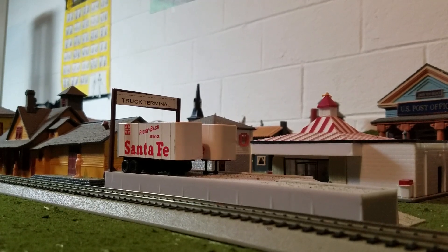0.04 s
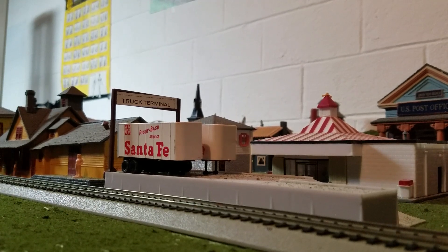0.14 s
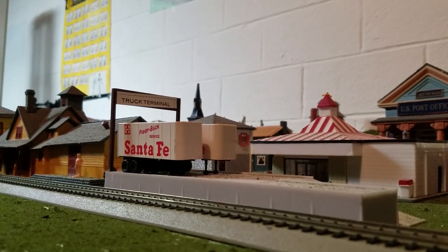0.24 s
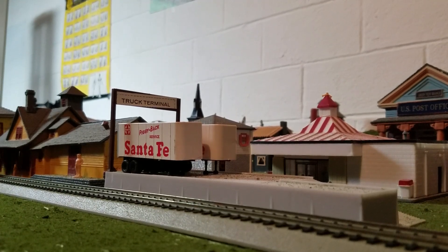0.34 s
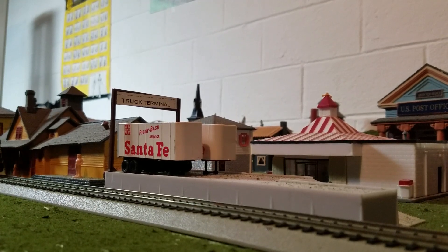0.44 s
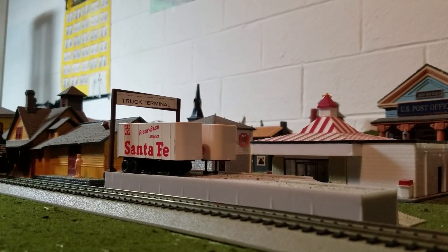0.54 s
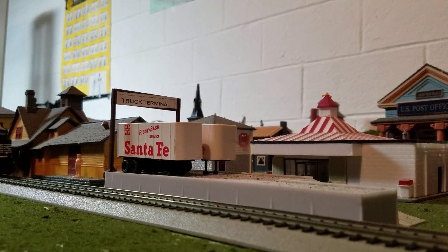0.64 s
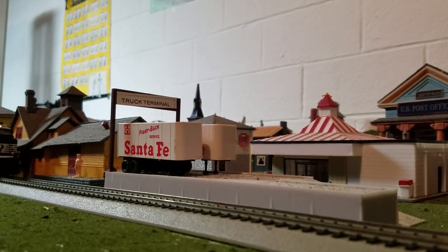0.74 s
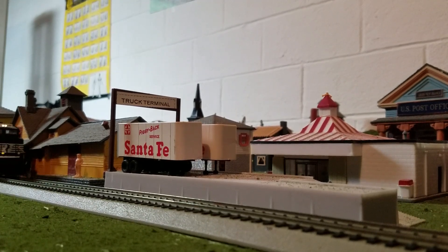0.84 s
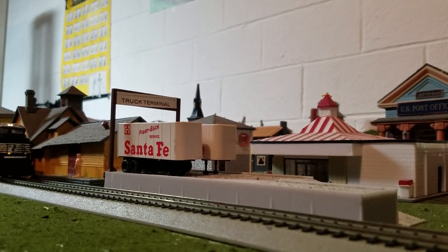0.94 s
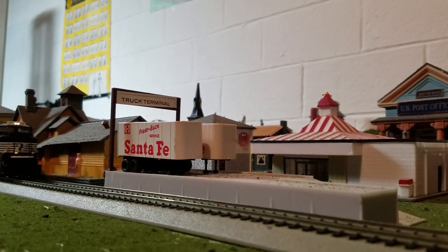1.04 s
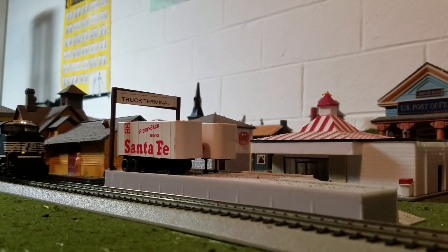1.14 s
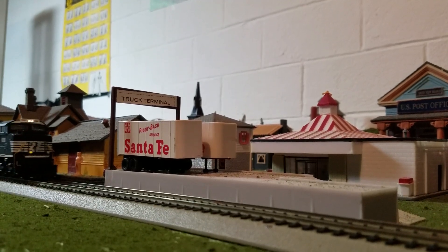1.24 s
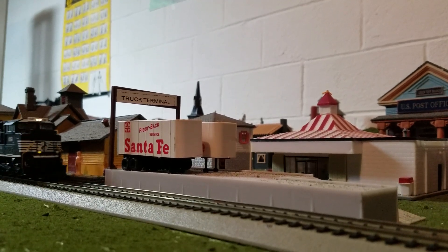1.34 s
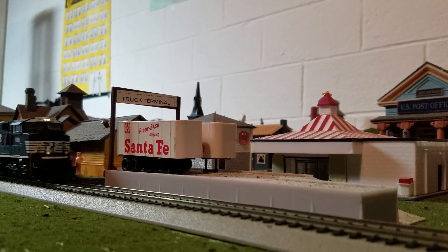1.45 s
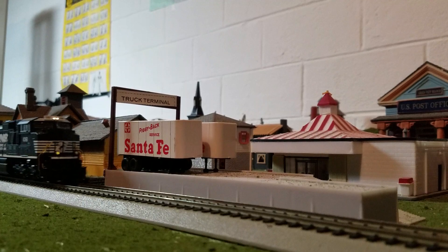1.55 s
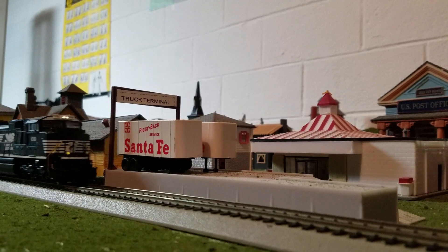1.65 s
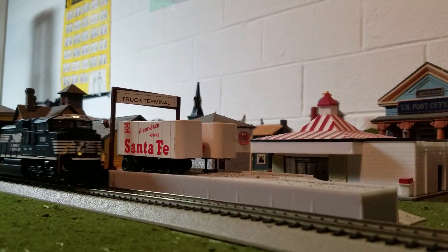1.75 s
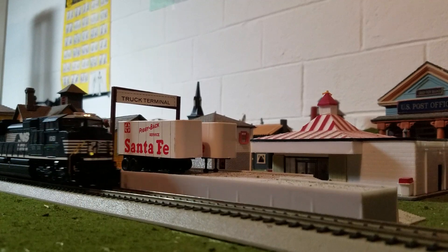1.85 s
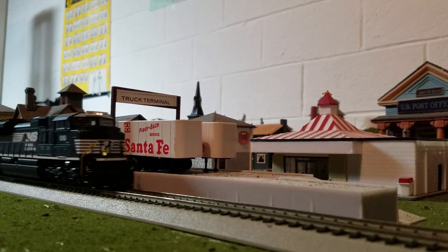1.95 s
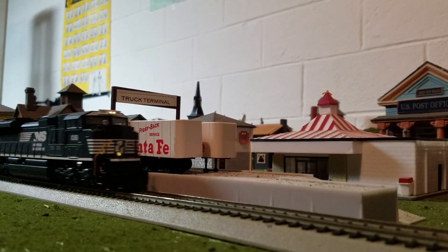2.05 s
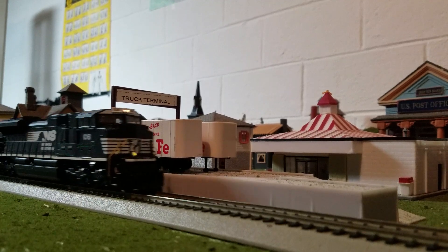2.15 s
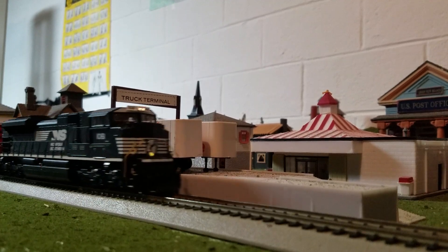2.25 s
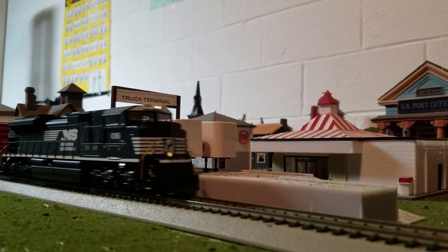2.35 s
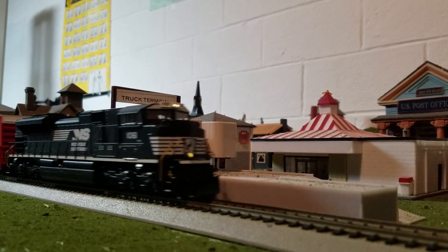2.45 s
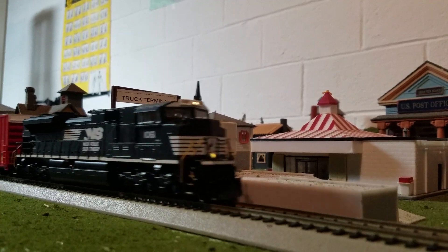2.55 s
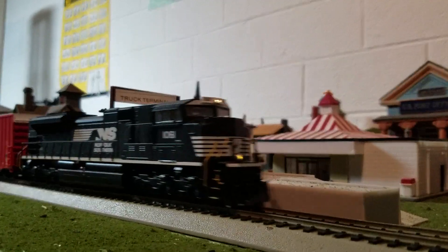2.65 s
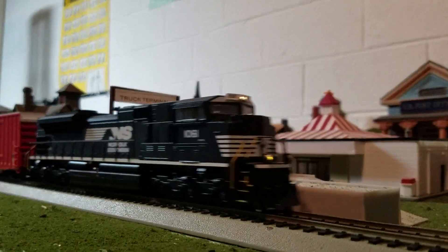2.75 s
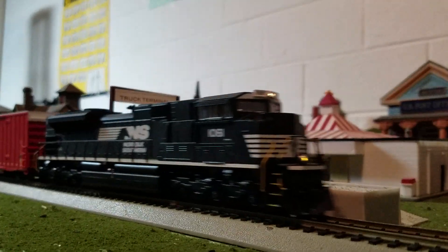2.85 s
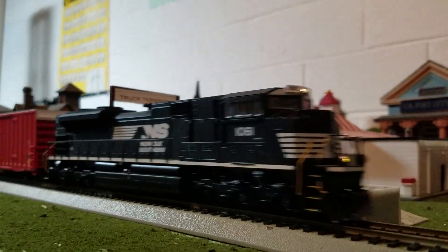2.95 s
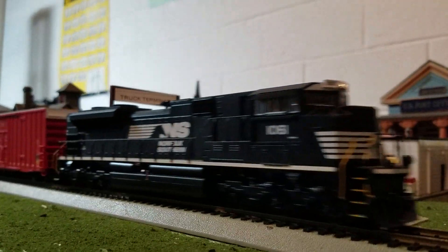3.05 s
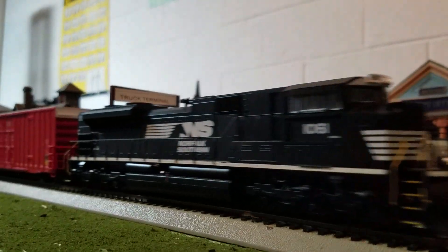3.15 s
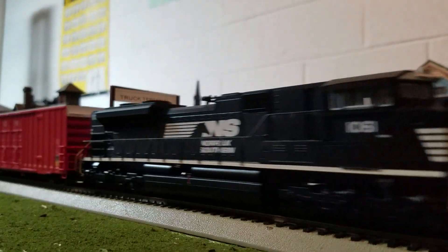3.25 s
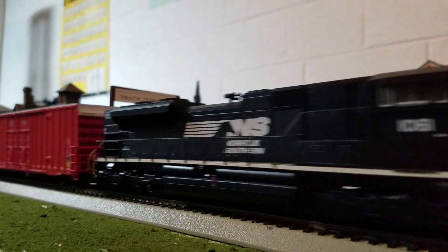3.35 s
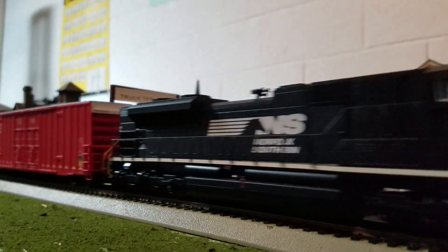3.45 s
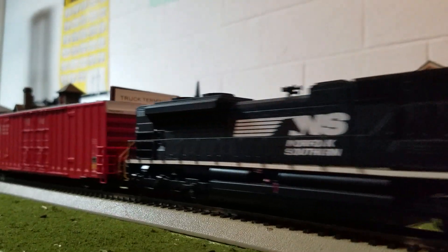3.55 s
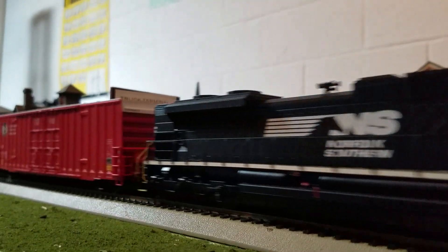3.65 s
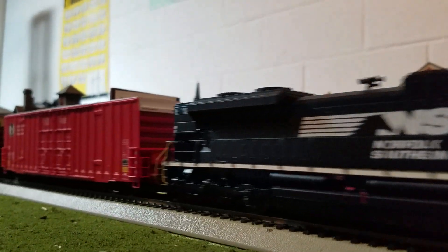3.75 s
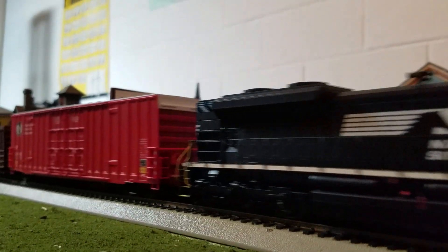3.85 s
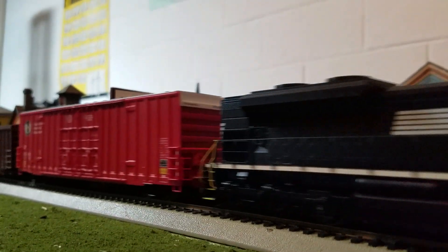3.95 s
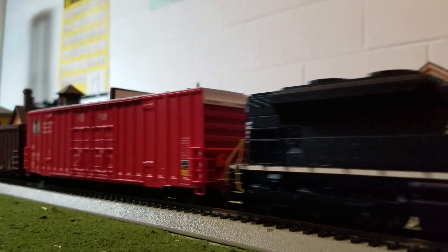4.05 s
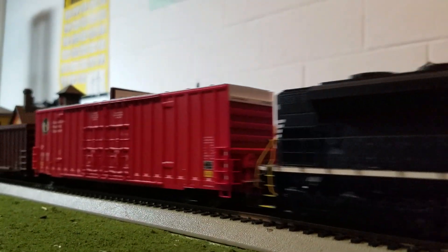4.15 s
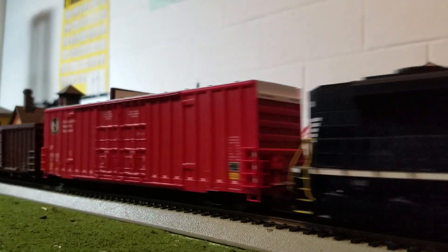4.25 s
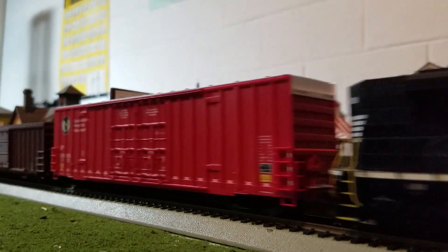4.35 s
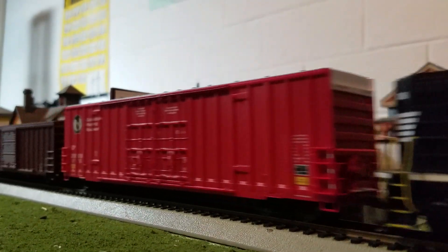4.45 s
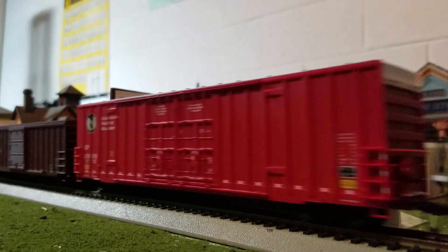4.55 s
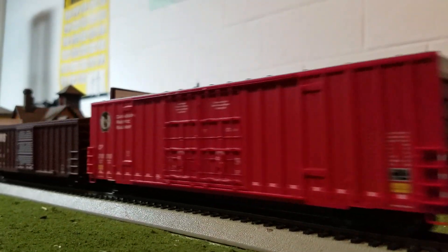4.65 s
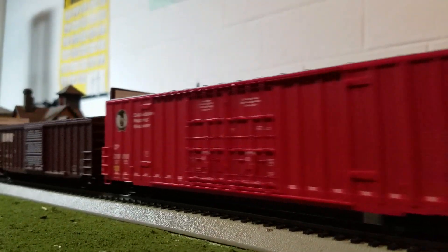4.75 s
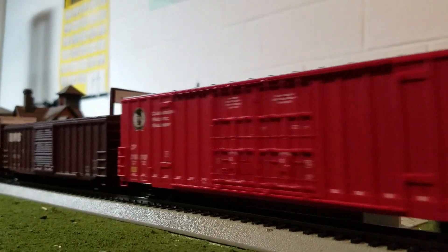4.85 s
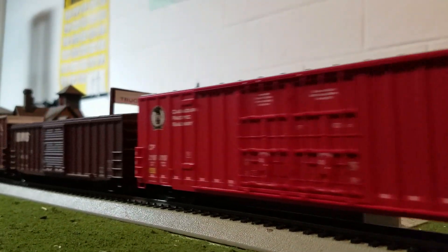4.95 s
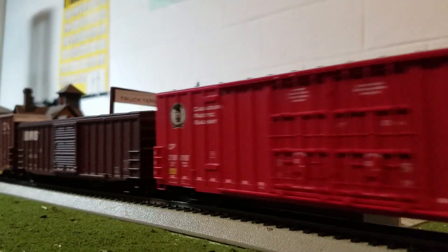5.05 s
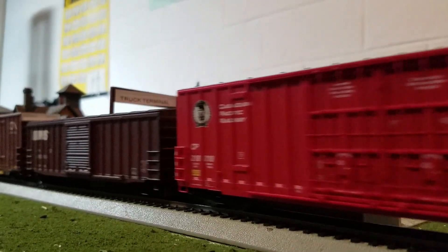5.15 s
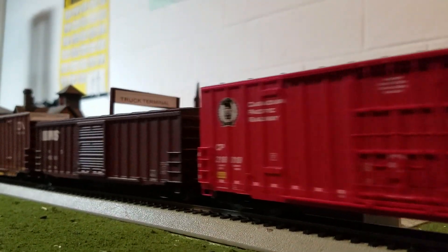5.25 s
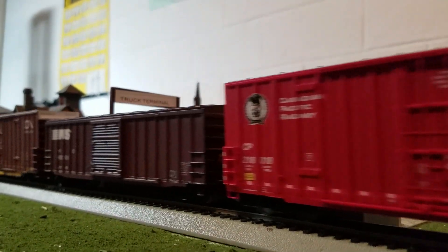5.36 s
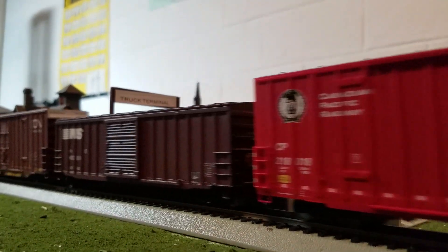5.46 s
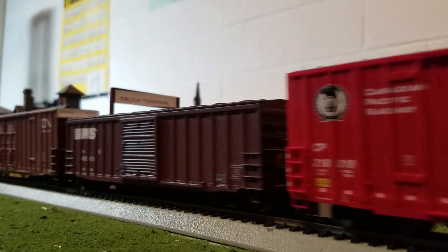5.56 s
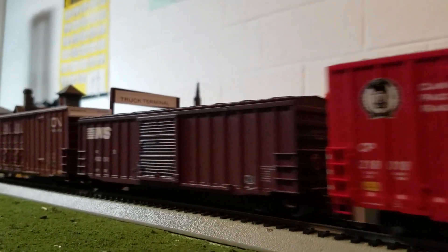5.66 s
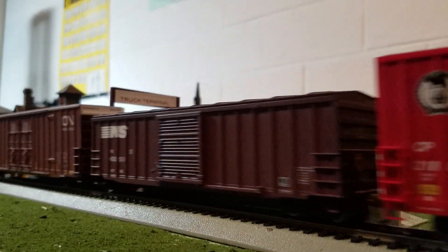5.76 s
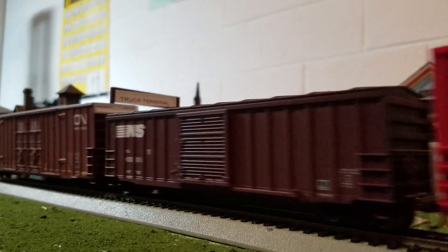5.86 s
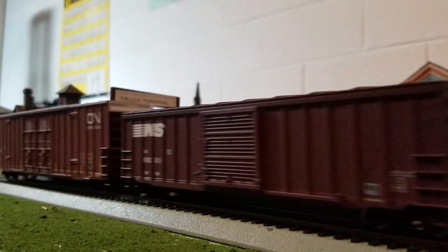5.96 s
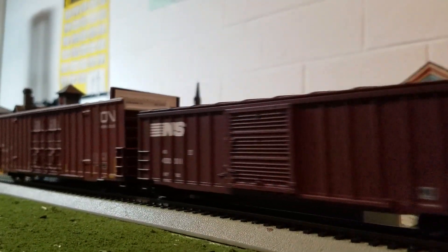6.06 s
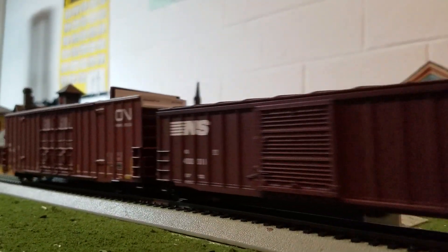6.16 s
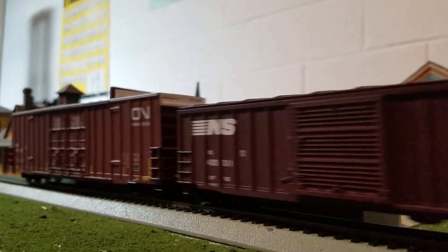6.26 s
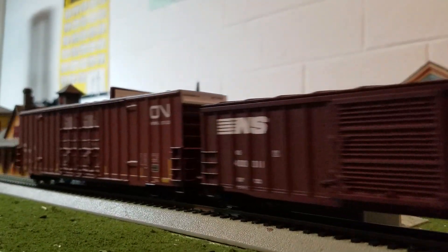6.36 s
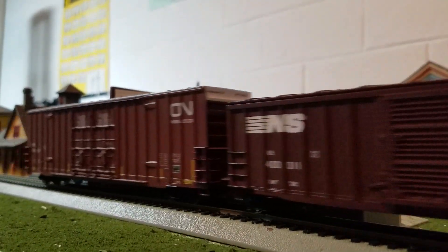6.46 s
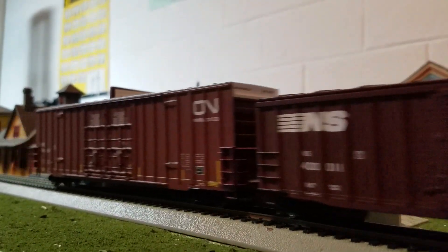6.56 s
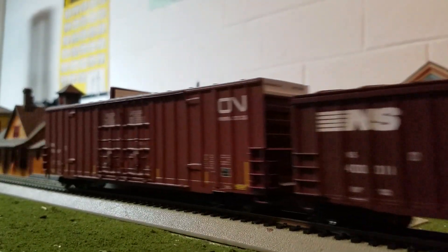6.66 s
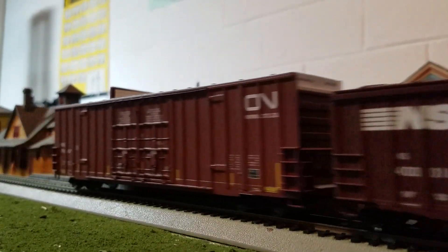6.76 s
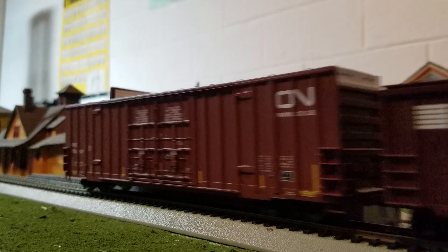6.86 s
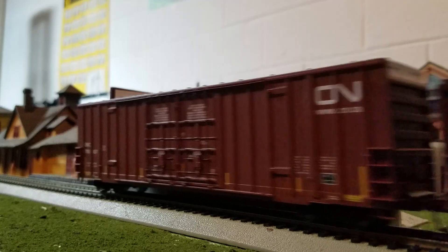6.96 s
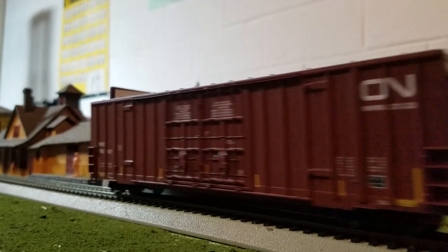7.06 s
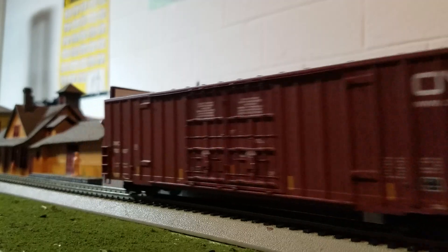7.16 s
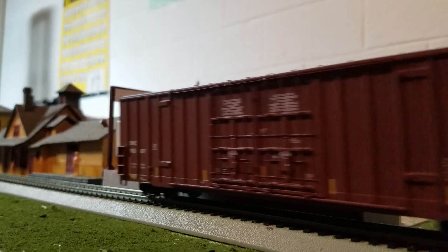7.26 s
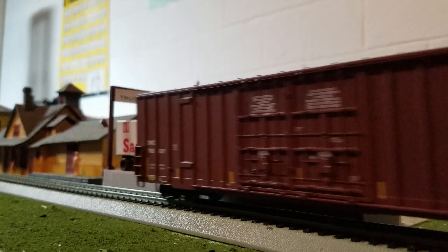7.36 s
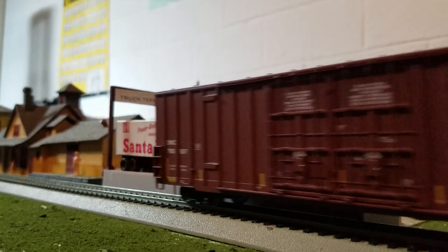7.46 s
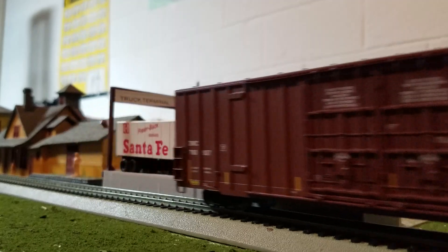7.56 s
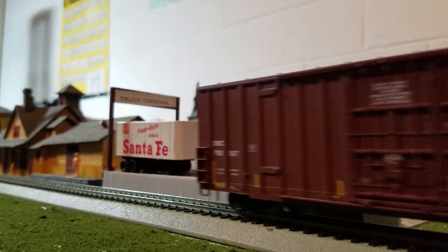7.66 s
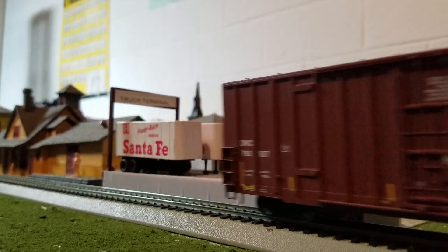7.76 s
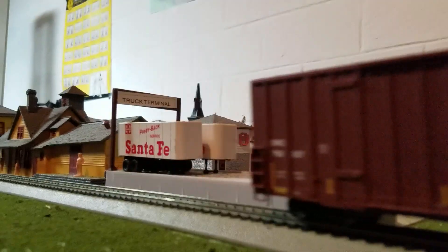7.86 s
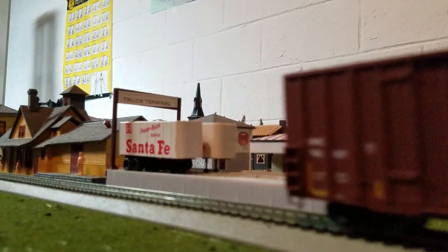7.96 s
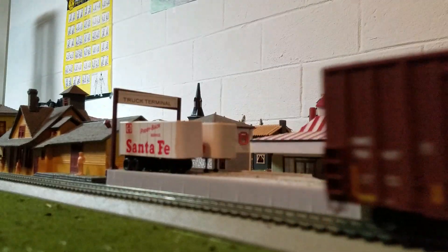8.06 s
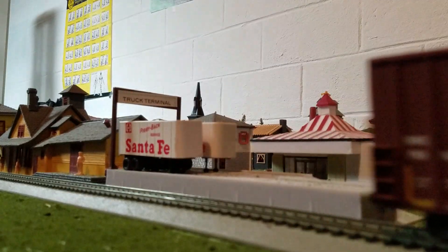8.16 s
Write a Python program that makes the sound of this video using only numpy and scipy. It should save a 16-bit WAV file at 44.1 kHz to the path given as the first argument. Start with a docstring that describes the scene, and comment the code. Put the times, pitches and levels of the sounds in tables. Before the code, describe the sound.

Indoors, a toy-scale electric locomotive passes very close with a steady gear whine and plastic rattle, followed by cars hissing and clicking over track.

```python
"""A model locomotive pulls box cars from left to right, close past a pair of microphones beside the track.
Its gear mesh sings one whining note, and its gears chatter in a pattern that returns with the axles.
The gears also shake the chassis and knock the plastic shell, which rings in bursts.
Its wheels hiss and crackle on the rails, tick over joints and make the baseboard rumble.
Room air and a faint hum, stronger on the right, lie underneath."""
import sys
import numpy as np
from scipy import signal
from scipy.fft import rfft, irfft, next_fast_len
from scipy.io import wavfile
from scipy.ndimage import map_coordinates

SR = 44100
rng = np.random.default_rng(int(sys.argv[2]) if len(sys.argv) > 2 else 0)


def dump(signal):
    """Clip the signal to [-1, 1] and save it as 16-bit WAV at the path in sys.argv[1]."""
    limited = np.clip(np.atleast_2d(signal).T, -1, 1)
    pcm = np.round(limited * 32767).astype(np.int16)
    wavfile.write(sys.argv[1], SR, pcm)


N = 362061
TIME = np.arange(N) / SR


def gain_of(db):
    """Decibels to amplitude."""
    return 10 ** (np.asarray(db) / 20)


def evened(x):
    """Scales each channel to rms 1."""
    return x / np.sqrt(np.mean(x ** 2, axis=-1, keepdims=True) + 1e-20)


def curves(rows):
    """The columns of a table, joined by straight lines in time."""
    s, *columns = np.transpose(rows)
    return np.array([np.interp(TIME, s, c) for c in columns])


def swells(rows):
    """Each row is a smooth rise or dip and return; gives one summed curve for each column of depths."""
    total = 0
    for s, width_s, *depths in rows:
        bump = np.exp(-((TIME - s) / width_s) ** 2)
        total = total + np.outer(depths, bump)
    return total


def passing(ears):
    """Level in dB at each ear: it swells as a part draws near and sinks to the far level either side."""
    def level(closest_s, width_s, near_db, before_db, after_db):
        offset = (TIME - closest_s) / width_s
        far_db = np.where(offset < 0, before_db, after_db)
        return far_db + (near_db - far_db) / (1 + offset ** 2)
    return np.array([level(*ear) for ear in ears])


def colour(x, points, band=None):
    """Shapes flat noise to a spectrum given as (Hz, dB); rms is 1 overall, or about 1 within a band."""
    size = next_fast_len(x.shape[-1], True)
    hz = np.fft.rfftfreq(size, 1 / SR)
    f, db = np.transpose(points)
    gain = gain_of(np.interp(np.log(hz + 1), np.log(f), db))
    inside = 1 if band is None else (hz > band[0]) & (hz < band[1])
    share = np.sum(gain ** 2 * inside) / np.sum(gain ** 2)  # of the power that lies in the band
    shaped = irfft(rfft(x, size) * gain, size)[..., :x.shape[-1]]
    return evened(shaped) / np.sqrt(share)


def wander(rate_hz):
    """Smooth random drift of rms 1, weakening above rate_hz."""
    coarse = rng.standard_normal(N // 64 + 2)  # one point every 64 samples
    hz = np.fft.rfftfreq(len(coarse), 64 / SR)
    slow = irfft(rfft(coarse) / (1 + (hz / rate_hz) ** 2), len(coarse))
    return evened(np.interp(np.arange(N) / 64, np.arange(len(slow)), slow))


def moving_echo(x, echo, delay_s, sweep):
    """An echo whose path length wanders sweeps a shallow comb through the sound."""
    delay = SR * delay_s * np.exp(sweep * wander(rate_hz=0.58))
    return x + echo * map_coordinates(x, [np.arange(N) - delay], order=3)


def room(x, t60):
    """Dense reflections from the layout and the walls, different at each ear, falling 60 dB in t60 s."""
    t = np.arange(SR // 2) / SR
    decay = gain_of(-60 * t / t60) * (t > .002)
    tail = evened(rng.standard_normal((2, len(t))) * decay) / np.sqrt(len(t))
    return signal.oaconvolve(np.atleast_2d(x) * np.ones((2, 1)), tail, axes=1)[:, :N]


# Bearing of the locomotive from the microphones. Each row: time in seconds, lag of the left ear in ms.
BEARING = [(0, -0.26), (2.5, -0.19), (3.25, -0.15), (3.75, -0.096), (4.25, 0.047), (4.75, 0.29),
           (5.25, 0.46), (5.75, 0.49), (8.2, 0.48)]


def at_ears(x, wet):
    """Direct sound reaches one ear first; the model buildings and the room answer from all round."""
    lag = curves(BEARING)[0] * SR / 1000  # samples
    x = moving_echo(x, echo=0.23, delay_s=.0028, sweep=0.147)
    direct = np.array([map_coordinates(x, [np.arange(N) - side * lag / 2], order=3) for side in (1, -1)])
    return evened(evened(direct) + wet * evened(room(x, t60=0.09)))


# Sharp resonances of frame and shell. Each row: centre in Hz, width in Hz, lift (or cut) in dB.
RINGS = [(609, 5.4, 3), (998.5, 3.2, 10), (1179, 10.6, 10.5), (1430, 11, 12), (1936, 51, -1.5),
         (2100, 17, -6.5), (2010, 52, 4.5), (2093, 32, 2.5), (2370, 9.6, 1.5), (2857, 4.1, 5),
         (2810, 7.2, -5), (3420, 8.1, 3)]


def ringing(x):
    """Narrow resonances of the metal and plastic lift or cut a few of the gear's orders."""
    size = next_fast_len(N, True)
    hz = np.fft.rfftfreq(size, 1 / SR)
    gain = 1 + sum((gain_of(db) - 1) / (1 + 2j * (hz - f) / width) for f, width, db in RINGS)
    return irfft(rfft(x, size) * gain, size)[:N]


GEAR_ORDER = 3  # gear turns per axle turn


def tooth_noise(turns, gear_share, loose_share):
    """Tooth flaws return with each turn of the gear and of the axle; loose play never repeats."""
    def flaws(phase, size):
        profile = irfft(np.exp(2j * np.pi * rng.random(size)))  # all orders equally strong
        return evened(map_coordinates(profile, [phase % 1 * len(profile)], order=3, mode="grid-wrap"))
    gear, loose = np.clip([gear_share, loose_share], 0, 1)
    gear_flaws = flaws(GEAR_ORDER * turns, size=701)
    axle_flaws = flaws(turns, size=2101)
    locked = np.sqrt(gear) * gear_flaws + np.sqrt(1 - gear) * axle_flaws
    play = rng.standard_normal(N)
    return ringing(np.sqrt(1 - loose) * locked + np.sqrt(loose) * play)


# Rhythm of the knocks on the shell. Each entry: multiple of the axle rate.
KNOCK_ORDERS = [2, 6, 9, 12, 21]
# Each entry: depth in dB of the knock at that multiple, before limiting and each part's own share.
KNOCK_DB = [0.68, 1.4, 1.6, 0.76, 3]


def knocks(turns):
    """Level of the gear knocks in dB, repeating with the axle; the play in the gears limits the hardest."""
    limit_db = 4
    swing_db = 0
    for order, db in zip(KNOCK_ORDERS, KNOCK_DB):
        swing_db = swing_db + db * np.cos(2 * np.pi * (order * turns + rng.random()))
    return np.minimum(swing_db, limit_db * np.tanh(swing_db / limit_db))


# Colours of the parts that the gears shake. Each row: frequency in Hz, relative density in dB per Hz.
CHASSIS = [(50, -55), (150, -42), (300, -24), (540, -25.5), (640, -7.5), (830, -7.5), (900, -3), (1010, 2),
           (1300, -1), (1500, -15), (1750, -2.5), (2100, -36), (3000, -60)]
SHELL = [(1300, -43), (1650, -21.5), (1850, -9), (1930, 0), (2020, -3.5), (2130, -2), (2250, -21),
         (2500, -15), (3200, -58)]
TEETH = [(1600, -38), (2100, -8), (2390, -2), (2560, -2.5), (2780, 1), (3080, -2.5), (3300, -9.5),
         (3800, -30), (5000, -50)]
METAL = [(2900, -40), (3200, -3), (3360, 0.5), (3480, 4), (3620, -2.5), (3900, -9), (4250, -11.5),
         (4550, -26), (6000, -51)]
# How each part passes the microphones, left ear then right. Each row: closest in seconds,
# half-width in seconds, level there in dB, far level before in dB, far level after in dB.
CHASSIS_PASS = [(3.85, 1, -34, -45.5, -46.5), (4.52, 1.57, -23, -44, -38.5)]
SHELL_PASS = [(4.1, .8, -30, -37, -36.5), (4.7, 1.53, -26.5, -35.5, -32)]
TEETH_PASS = [(4.05, 1.2, -28, -41, -53), (4.63, 1.63, -17.5, -37, -35.5)]
METAL_PASS = [(4.13, 1.27, -28.5, -51, -50.5), (4.6, 1.73, -22.5, -41.5, -40.5)]
# The shell breaks into ringing. Each row: centre in seconds, half-width in seconds,
# left lift in dB, right lift in dB.
BURSTS = [(0.4, 0.14, 3, 4), (0.92, 0.16, 4, 4), (1.48, .22, 2, 6), (2.2, 0.22, 2, 2), (2.9, 0.26, 6, 9),
          (3.85, 0.35, 1.5, 6), (5.1, 0.4, -0.5, 10), (5.72, 0.23, 2, 5.5), (6.25, 0.16, 3, 5.5),
          (6.8, 0.21, 1.5, 4), (7.8, 0.21, 3, 4.5)]
# The chatter flares and dulls. Each row: centre in seconds, half-width in seconds,
# teeth left in dB, teeth right in dB, metal left in dB, metal right in dB.
FLARES = [(0.1, 0.38, -4, -2, 3, 0), (1.15, 0.56, 1.5, 3, 5, 2.5), (2.75, 0.19, 3.5, 3, -2, 4.5),
          (4.68, 0.22, 5, -0.5, -3, 1.5), (5.2, 0.29, -9, 1, -5, -3.5), (7.5, 0.17, -8, 1, -1, 0),
          (8.15, 0.22, -3, 4.5, -2, 2)]


def drive_train(turns):
    """The gears shake the chassis, knock the plastic shell into ringing, and chatter with a metallic edge."""
    knocks_db = knocks(turns)

    def part(gear_share, loose_share, knock_share, points, wet):
        shaken = tooth_noise(turns, gear_share, loose_share) * gain_of(knock_share * knocks_db)
        return at_ears(colour(shaken, points), wet)
    chassis = part(gear_share=0.8, loose_share=0.49, knock_share=0, points=CHASSIS, wet=0.42)
    shell = part(gear_share=0.73, loose_share=0.74, knock_share=1, points=SHELL, wet=0.51)
    teeth = part(gear_share=0.78, loose_share=0.72, knock_share=0.037, points=TEETH, wet=0.3)
    metal = part(gear_share=0.56, loose_share=0.61, knock_share=.5, points=METAL, wet=0.47)
    teeth_db, metal_db = swells(FLARES).reshape(2, 2, N)
    body = chassis * gain_of(passing(CHASSIS_PASS)) + shell * gain_of(passing(SHELL_PASS) + swells(BURSTS))
    chatter = teeth * gain_of(passing(TEETH_PASS) + teeth_db)
    edge = metal * gain_of(passing(METAL_PASS) + metal_db)
    return body + chatter + edge


# Running speed before its flutter. Each row: time in seconds, axle turns per second.
SPEED = [(0, 4.2085), (3.5, 4.2085), (5.2, 4.204), (8.2, 4.204)]
# The whine passing, left ear then right. Each row: closest in seconds, half-width in seconds,
# level there in dB, far level before in dB, far level after in dB.
WHINE_PASS = [(3.97, 1.4, -25.5, -24.5, -37.5), (4.97, 1.035, -14.5, -25, -31)]
# The whine fades and swells as it moves through its own reflections. Each row: centre in seconds,
# half-width in seconds, left change in dB, right change in dB, phase swing between the ears in rad.
FADES = [(0.02, 0.75, -13, -5, 0.1), (0.83, 0.24, -21, -14, 3.5), (1.52, 0.39, -15, -14.5, 3.5),
         (2.26, .46, -3.5, -2.4, 1.46), (2.68, 0.3, -6.5, -16.5, -0.96), (4.0, 0.31, 4.5, -11, 0),
         (5.9, .11, -8, -4, 1), (6.33, 0.41, -6, 4, -1.2), (6.69, 0.18, 3, -8.5, -0.3),
         (7.43, .11, -6, -11, -1.5)]
MESH_ORDER = 331  # cycles of the note per axle turn
THIRD_DB = -30  # third harmonic, relative to the main note without its fades


def whine(turns):
    """The gear mesh sings a slightly trembling note, nearer ear first, with a weak third harmonic."""
    left_db, right_db, swing = swells(FADES)
    lag_s = curves(BEARING)[0] / 1000
    lead = swing - 2 * np.pi * MESH_ORDER * curves(SPEED)[0] * lag_s  # left ear against right, rad
    tremble = 0.14 * wander(rate_hz=66)  # rad
    phase = 2 * np.pi * MESH_ORDER * turns + tremble + np.array([lead, -lead]) / 2
    pass_db = passing(WHINE_PASS)
    note_db = pass_db + np.array([left_db, right_db]) + 1.1 * wander(rate_hz=41)
    third_db = pass_db + THIRD_DB + 2.0 * wander(rate_hz=6)
    return np.sqrt(2) * (gain_of(note_db) * np.sin(phase) + gain_of(third_db) * np.sin(3 * phase))


# How near the cars are. Each row: time in seconds, share of near hiss from 0 to 1.
NEARNESS = [(0, 0.14), (3.2, 0.14), (4, 0.88), (4.8, 1), (8.2, 0.75)]


def between_cars(x):
    """The sides of the near cars throw the hiss back over a short path."""
    return moving_echo(x, echo=0.25 * curves(NEARNESS)[0], delay_s=0.000487, sweep=0.29)


# Colours of the hiss at the left ear, close at the right ear, and at the right ear from wheels
# still some way off. Each row: frequency in Hz, relative density in dB per Hz.
HISS_LEFT = [(40, -30), (300, -19), (600, 1), (1100, 10.5), (1600, 10), (2700, 16), (4000, 4), (4800, -1.5),
             (6500, 0), (8000, 3), (9200, 5.5), (10300, -3), (12000, -11.5), (15500, -14)]
HISS_RIGHT = [(40, -39), (300, -7), (600, -7.5), (1100, 4), (1600, 9.5), (2700, -2), (4200, 5), (5400, 2),
              (6550, -10.5), (7600, 2.5), (8900, -1), (9800, -17), (11000, -31), (13200, -26), (15200, -29)]
HISS_FAR = [(40, -42), (300, -9), (600, -4.5), (1100, -20), (1650, -3), (2700, 2.5), (4200, -6.5),
            (5200, 2.5), (6500, -2), (7800, 0), (9300, 1), (9620, -2), (10200, -17), (11200, -23),
            (15200, -26)]
# Colour of the baseboard rumble. Each row: frequency in Hz, relative density in dB per Hz.
BOARD = [(20, -26), (50, -11), (62, 3), (110, 1), (190, 4.5), (330, -2.5), (520, -14), (900, -6),
         (2000, -60)]
# The hiss passing, left ear then right. Each row: closest in seconds, half-width in seconds,
# level there in dB, far level before in dB, far level after in dB.
HISS_PASS = [(3.5, 2.0, -43.5, -55, -47), (6.1, 2.69, -32, -49, -44)]
# A group of wheels rolls right past. Each row: centre in seconds, half-width in seconds,
# left hiss lift in dB, right hiss lift in dB, rumble lift in dB.
TRUCKS = [(4.03, 0.2, 0.5, 4.5, 7), (5.55, 0.25, 0.5, 1, 4), (6.0, 0.26, 2, 0, 1), (6.85, 0.46, 2, 0.1, 1)]
# The train rolls onto the near part of the baseboard; levels are before each ear's own gain.
BOARD_AT_S, BOARD_RISE_S, BOARD_FAR_DB, BOARD_NEAR_DB = 3.5, 0.071, -73.5, -58.5


def wheels():
    """Metal wheels hiss over rough rail with a fine crackle, and the baseboard rumbles under them."""
    on_board = (1 + np.tanh((TIME - BOARD_AT_S) / (2 * BOARD_RISE_S))) / 2
    step_db = BOARD_FAR_DB + (BOARD_NEAR_DB - BOARD_FAR_DB) * on_board
    left_db, right_db, board_db = np.vstack([passing(HISS_PASS), step_db]) + swells(TRUCKS)

    grit_db = 3.5 * np.minimum(rng.exponential(1, (3, N)), 3)
    struck = rng.random((3, N)) < 1500 / SR  # about 1500 grains per second
    grit = rng.standard_normal((3, N)) * gain_of(grit_db) * struck
    contact = rng.standard_normal((3, N)) + 0.49 * evened(grit)
    contact = contact * gain_of(0.84 * wander(rate_hz=34))

    top = (7000, 10000)  # Hz, the band in which the hiss levels are set
    left, close, far = (colour(c, points, top)
                        for c, points in zip(contact, (HISS_LEFT, HISS_RIGHT, HISS_FAR)))
    near = np.clip(curves(NEARNESS)[0], 0, 1)
    right = np.sqrt(near) * close + np.sqrt(1 - near) * far
    hiss = np.array([between_cars(left) * gain_of(left_db), between_cars(right) * gain_of(right_db)])

    shared, own = rng.standard_normal(N), rng.standard_normal((2, N))
    rumble = colour(shared + 1.03 * own, BOARD)
    ear_db = np.array([[1.5], [6.0]])
    return hiss + rumble * gain_of(board_db + ear_db + 2.0 * wander(rate_hz=6.4))


# Wheels tick over rail joints. Each row: start in seconds, level in dB before the gains of tick and thud,
# left minus right in dB.
JOINTS = [(0.2369, -51, -4), (0.354, -49, -2), (0.894, -49, -1), (2.672, -49, -6), (3.0929, -46, -8),
          (3.1226, -42, -12), (3.3157, -47.5, -8), (3.8668, -40, -11), (4.576, -39.5, -3), (4.692, -43, -3),
          (4.792, -42.5, -6), (5.0582, -45, -11), (5.3304, -45, -11), (5.4457, -41.5, -8),
          (5.9299, -38.5, -8), (6.2525, -39, -11), (6.3677, -37, -11), (6.5578, -45, -11),
          (6.5837, -36.5, -14), (6.6912, -39.5, -7), (7.0764, -40, -8), (7.3967, -39, -13),
          (7.509, -36, -12), (7.6131, -46, -12), (7.7372, -42, -15), (7.743, -41.5, -15), (7.854, -38, -11),
          (7.879, -43, -12), (7.9942, -42, -8), (8.0501, -43, -8), (8.1698, -42, -6)]


def joints(rebound_s=.0035, rebound=0.25, thud_s=0.018):
    """Each wheel drops into a joint with a bright tick, bounces once, and nudges the baseboard."""
    t, out = np.arange(4096) / SR, np.zeros((2, N + 4096))
    rise_s, decay_s = .0006, .0016
    drop = (1 - np.exp(-t / rise_s)) * np.exp(-t / decay_s)
    bounce = rebound * np.exp(-abs(t - rebound_s) / decay_s) * (t > rebound_s)
    # colours: (Hz, relative dB per Hz)
    tick = [(100, -35), (1000, 0), (3000, -3), (5500, 6.0), (6600, -1.5), (8500, 11.5),
            (10500, -6.5), (13000, -14.5), (15500, -10)]
    board = [(40, -22), (150, -5), (320, -6.0), (700, -3.0), (1300, -18), (3000, -60)]
    for s, db, pan_db in JOINTS:
        burst = colour(rng.standard_normal((2, len(t))), tick) * (drop + bounce) * gain_of(db + 23.0)
        thud = colour(rng.standard_normal(len(t)), board) * np.exp(-t / thud_s) * gain_of(db - 4.5)
        pan = gain_of(np.array([[pan_db], [-pan_db]]) / 2)
        start = round(s * SR)
        out[:, start:start + len(t)] += (burst + thud) * pan
    direct = out[:, :N]
    return direct + .14 * room(direct, t60=.22)


# Colour of the room's still air. Each row: frequency in Hz, relative density in dB per Hz.
ROOM_NOISE = [(20, -23), (80, -28), (160, -12.5), (330, 4.5), (560, 4), (1000, -4.5), (3000, -36)]
# A faint hum. Each row: time in seconds, level at the right ear in dB.
HUM = [(0, -55), (1.7, -55), (2.4, -60.5), (3.2, -72), (8.2, -79)]
HUM_HZ = 186


def background():
    """Still air of the room as coloured noise, and a faint steady-pitched hum, mostly on the right."""
    air = colour(rng.standard_normal((2, N)), ROOM_NOISE) * gain_of([[-57], [-51]])
    hum = np.sqrt(2) * np.sin(2 * np.pi * HUM_HZ * TIME) * gain_of(curves(HUM)[0])
    return air + hum * gain_of([[-22], [0]])


def scene():
    """The axle speed, with a slight flutter, times the gears, knocks and whine of the locomotive."""
    flutter = 1 + .0007 * wander(rate_hz=3)
    turns = np.cumsum(curves(SPEED)[0] * flutter) / SR
    return drive_train(turns) + whine(turns) + wheels() + joints() + background()


EDGE_HZ = 15950  # upper band limit


def record(dry):
    """Peaks above a knee are rounded off; then the recorder's band limit."""
    knee, headroom = .7, .2  # amplitude
    over = np.maximum(abs(dry) - knee, 0)
    held = np.clip(dry, -knee, knee) + np.sign(dry) * headroom * np.tanh(over / headroom)
    lowpass = signal.firwin(511, EDGE_HZ, window=("kaiser", 9), fs=SR)
    return signal.oaconvolve(held, lowpass[None], "same", axes=1)


dry = scene()
out = record(dry)
dump(out)
```